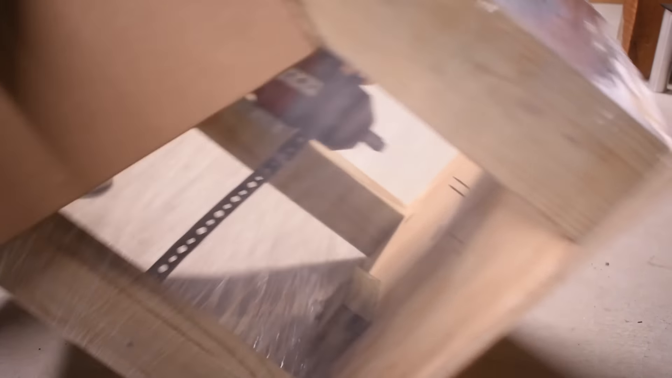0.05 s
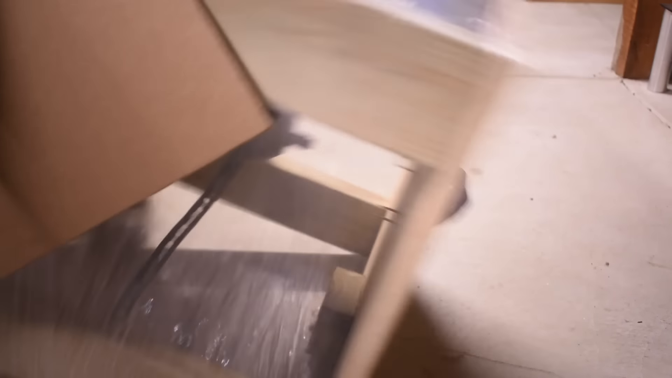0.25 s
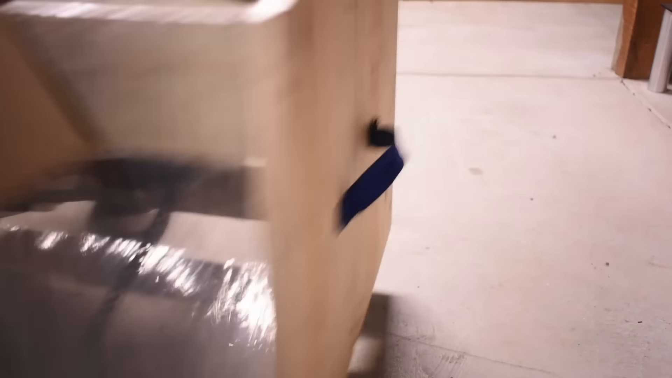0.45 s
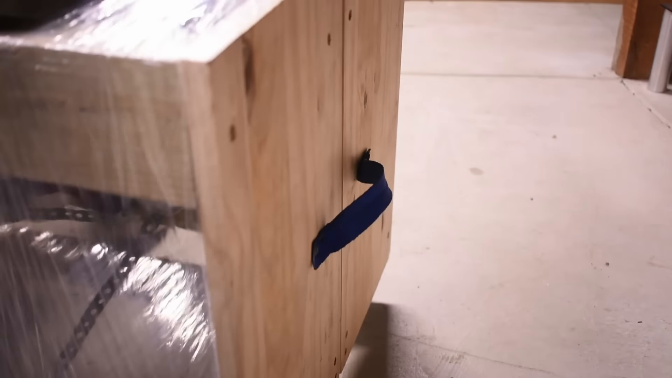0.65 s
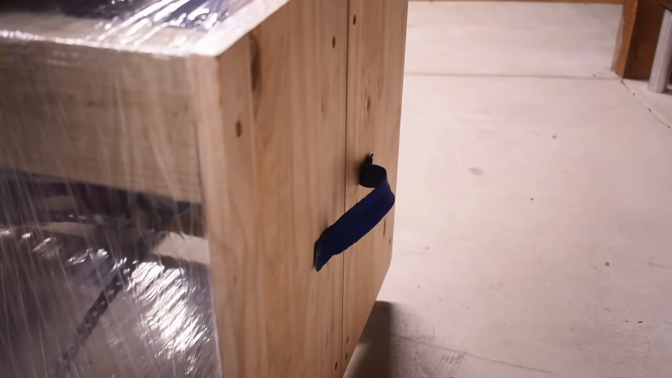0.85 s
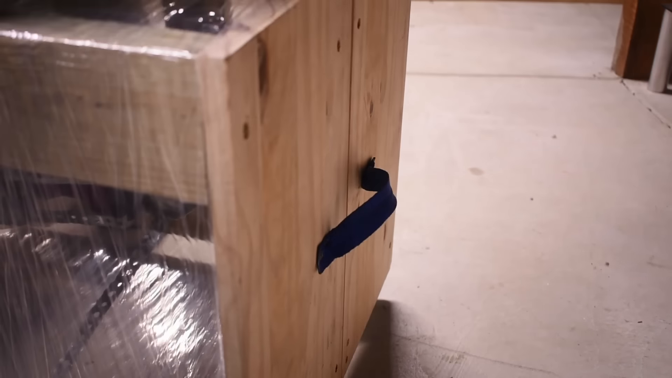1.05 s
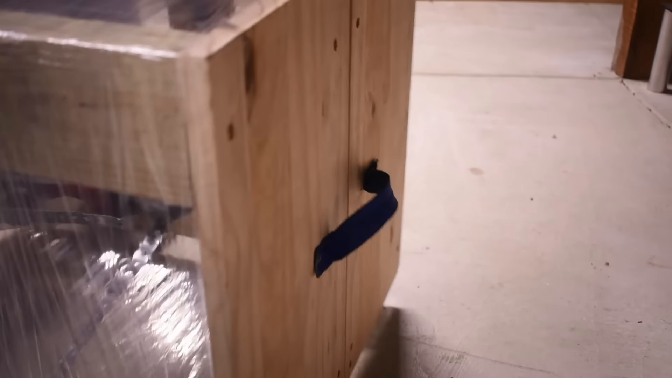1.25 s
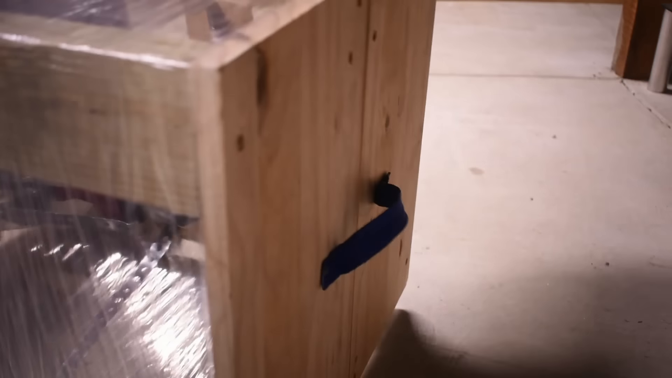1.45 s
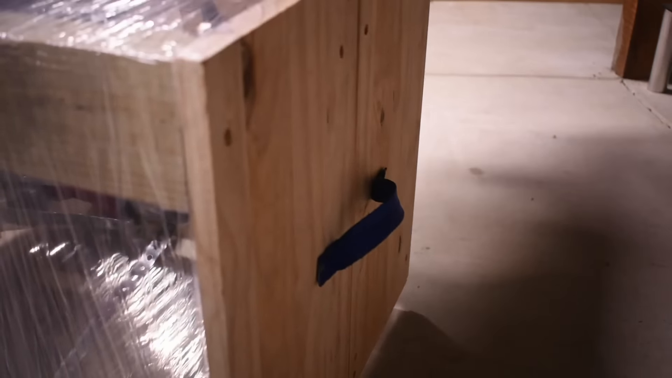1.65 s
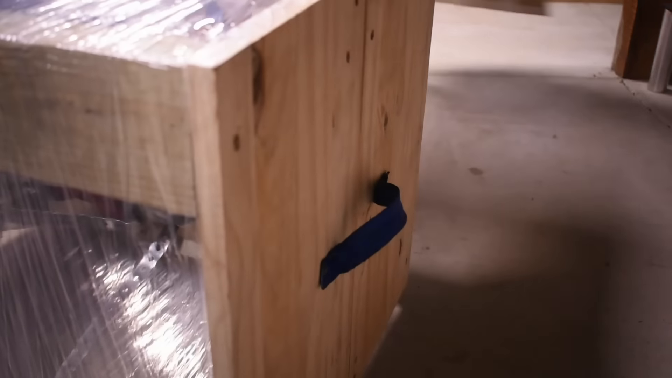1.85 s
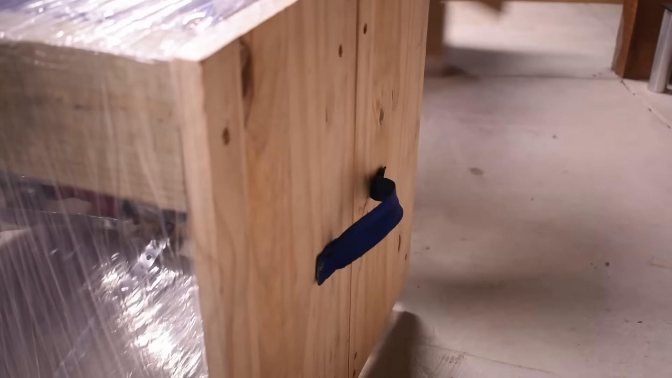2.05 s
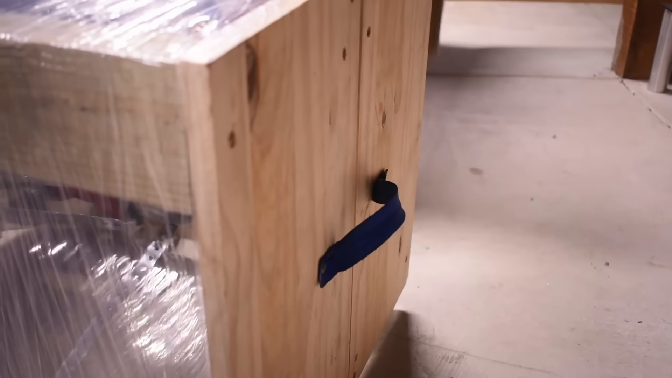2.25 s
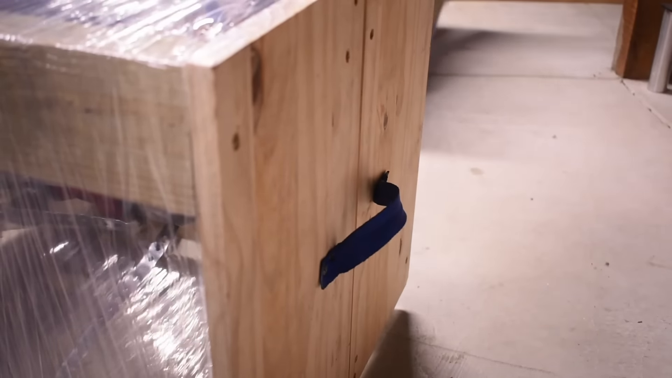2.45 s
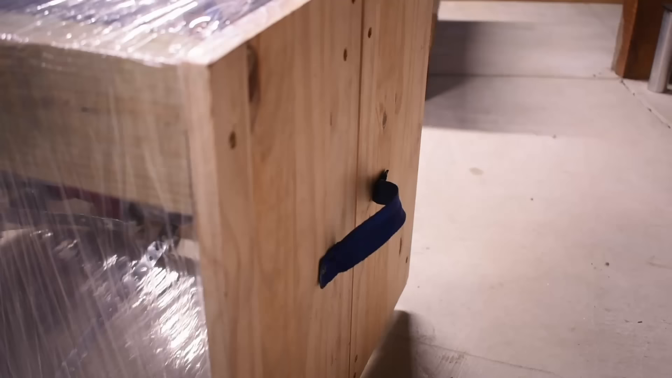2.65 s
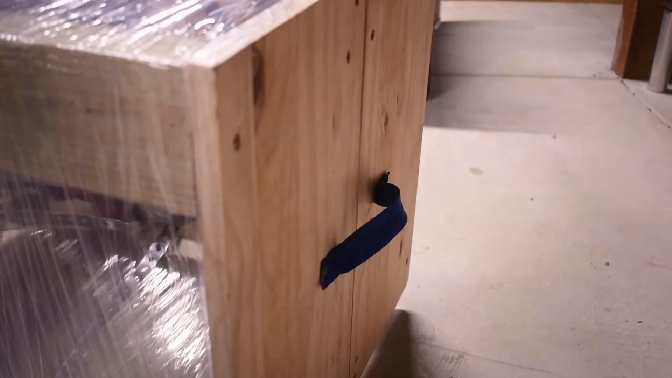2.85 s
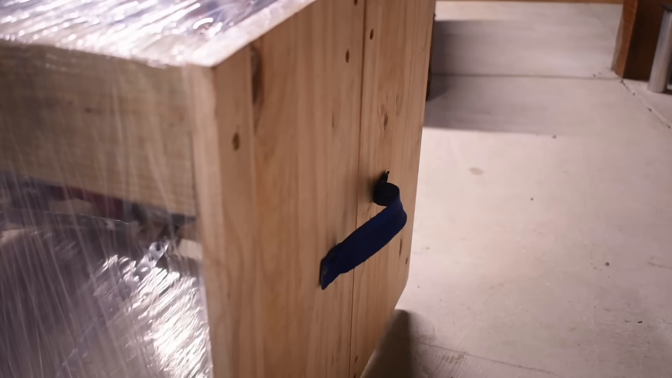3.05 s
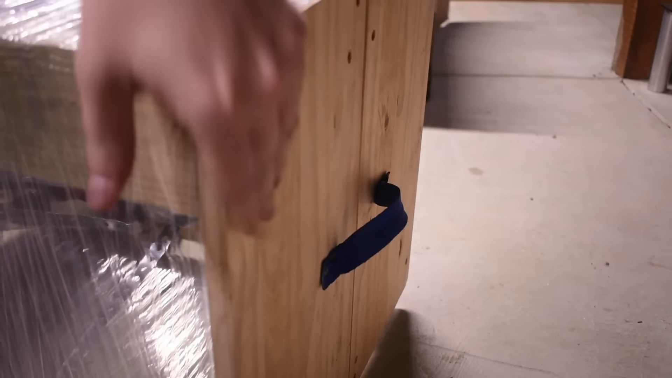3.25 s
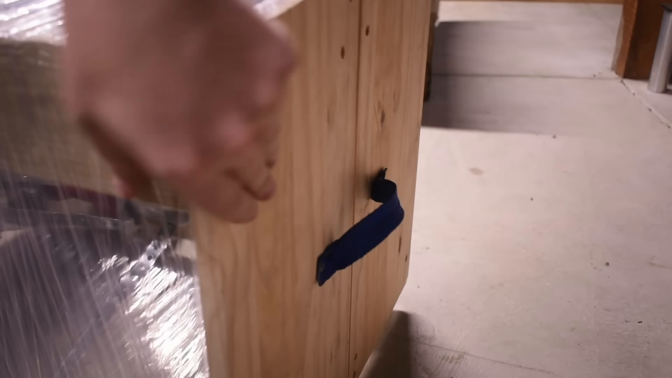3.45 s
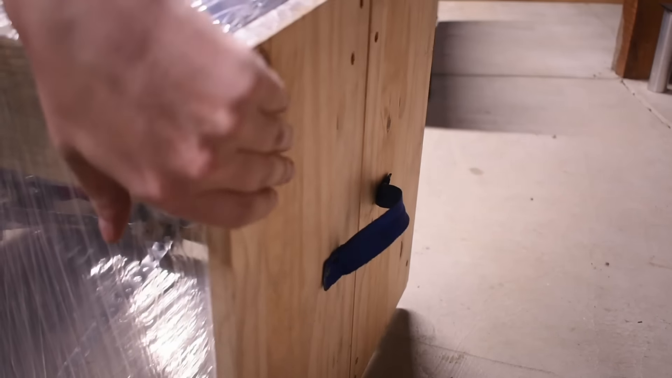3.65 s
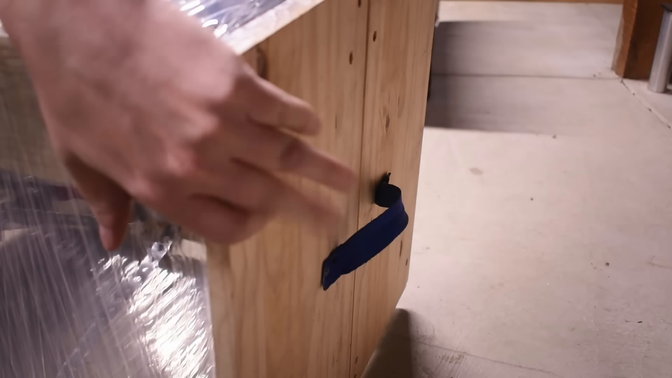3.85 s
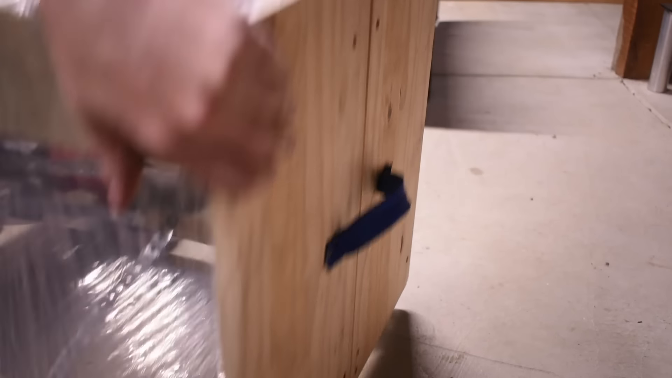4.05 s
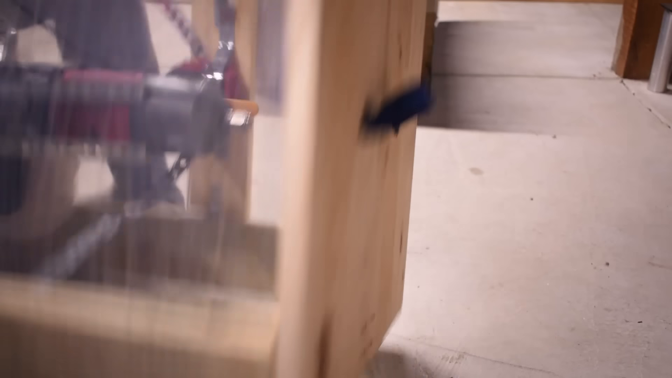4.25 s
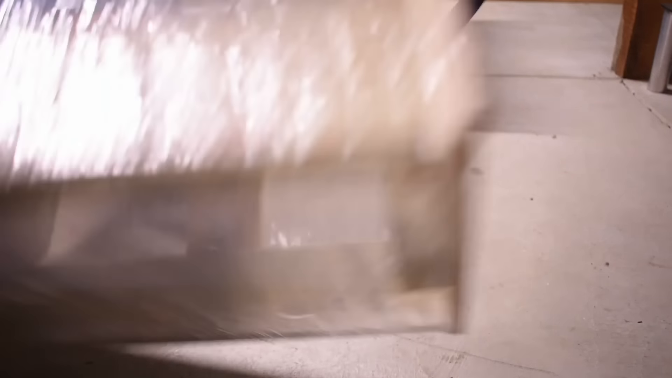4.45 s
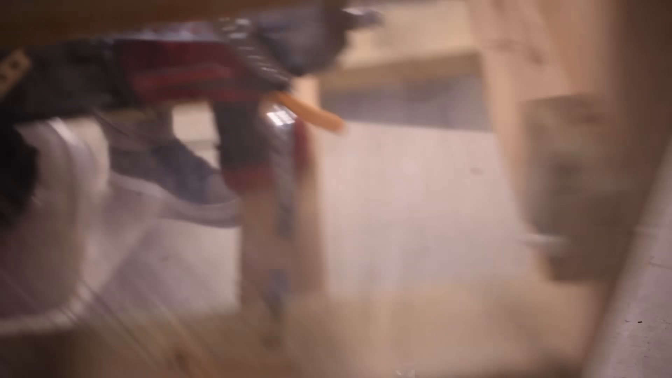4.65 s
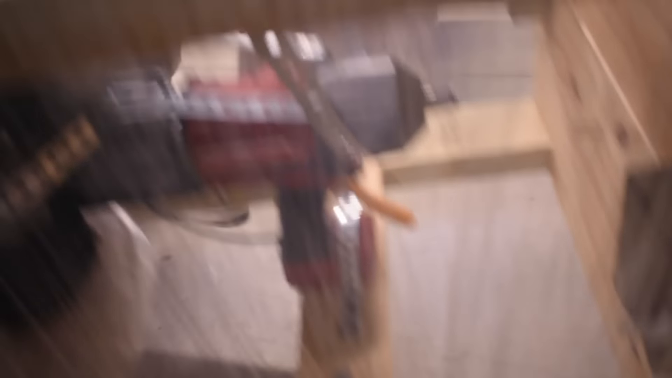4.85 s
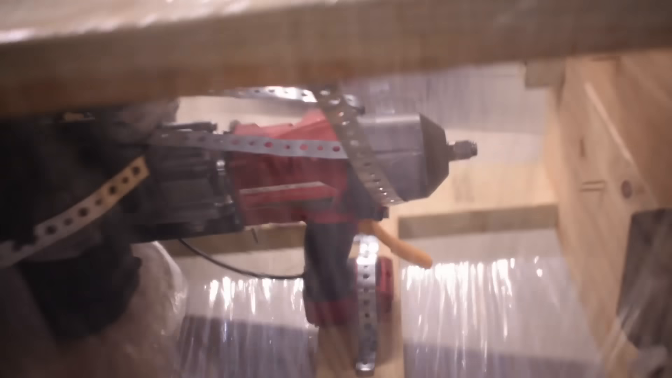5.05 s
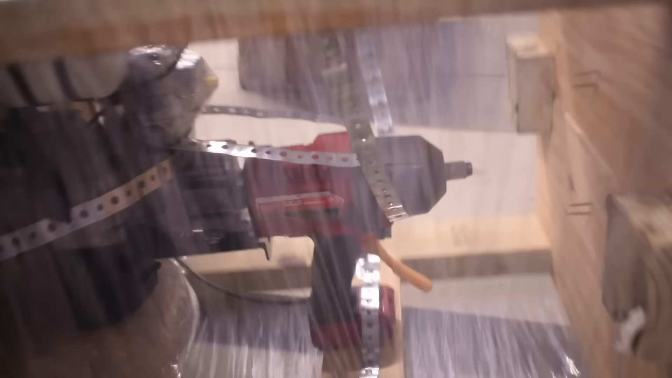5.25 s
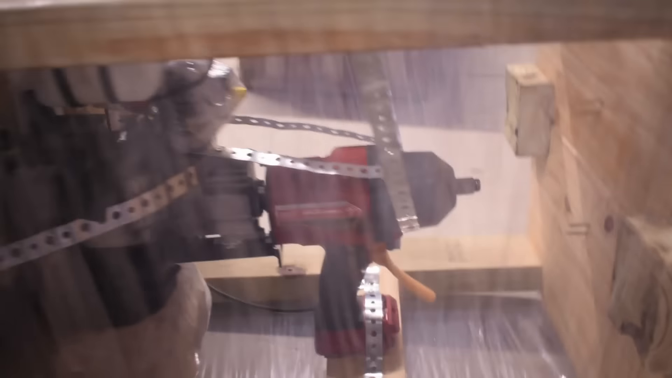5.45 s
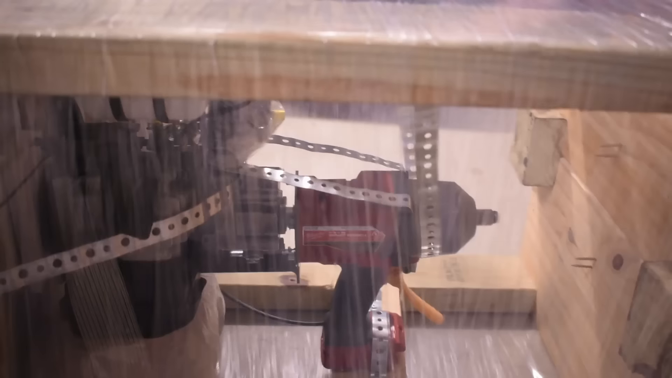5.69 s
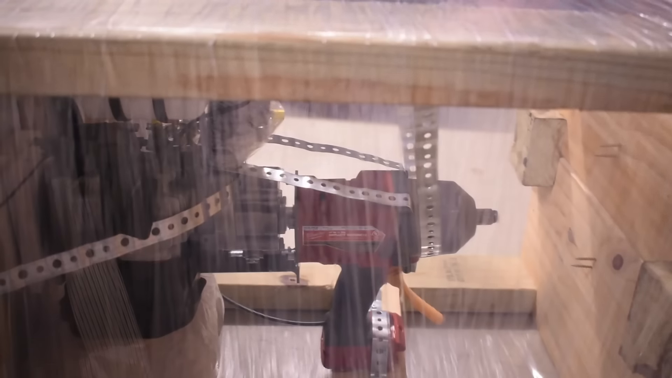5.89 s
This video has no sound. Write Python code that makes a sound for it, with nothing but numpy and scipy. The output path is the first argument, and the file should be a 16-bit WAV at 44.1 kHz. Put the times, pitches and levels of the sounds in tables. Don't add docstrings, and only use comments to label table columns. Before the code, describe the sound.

Heavy wooden thuds and scrapes from a film-wrapped crate, plastic rustling and snapping, faint taps in a lull, then more knocks close up.

```python
import sys
import numpy as np
from scipy import signal
from scipy.fft import rfft, irfft
from scipy.io import wavfile
from scipy.ndimage import uniform_filter1d

SR = 44100
rng = np.random.default_rng(int(sys.argv[2]) if len(sys.argv) > 2 else 0)


def wrap_up_sound(samples):
    columns = np.atleast_2d(samples).T
    tamed = np.clip(columns, -1, 1)
    steps = np.round(tamed * 32767).astype(np.int16)
    wavfile.write(sys.argv[1], SR, steps)


def linear_from_db(decibels):
    return 10 ** (np.asarray(decibels, float) / 20)


N = 261072

# start_s, build_up_s, boom_db,
# fade_s (time to fall 30 dB), shake_db (shaking under the camera, relative to the boom)
FLOOR_LOADS = [(0.049, 0.14, -43, 0.6, -1.5), (.32, .1, -39.5, .4, -6), (.54, 0.03, -37, 0.2, -19),
               (0.899, 0.13, -53.5, 0.26, -21), (1.163, .012, -51.5, .15, -19.5),
               (1.28, 0.046, -58, 1.16, -8), (2.125, .02, -41, 0.35, -6), (2.375, 0.037, -55.5, 0.7, -20),
               (2.47, 0.022, -44.5, .5, -6), (2.6, 0.044, -45, 0.25, -15), (2.83, 0.056, -56.5, 0.2, -4),
               (3.001, .05, -69.5, 1.5, -8), (3.58, 0.074, -66.5, 0.3, -11), (4.16, .1, -65.5, 1.2, -18),
               (4.31, 0.021, -47, 0.25, -28), (4.95, 0.022, -38, 0.13, -14), (5.318, 0.027, -51, .6, -15),
               (5.662, 0.021, -44, 0.12, -10), (5.86, 0.067, -67, .3, -4)]
# start_s, build_up_s, peak_db, fade_s (time to fall 30 dB)
SHOVES = [(.09, .11, -38, 0.78), (.31, 0.068, -30, 0.22), (.428, 0.021, -24, 0.13), (.556, 0.03, -32, 0.1),
          (.905, .045, -46.5, 0), (.987, .01, -45.5, 0.17), (1.164, 0.014, -56, 0.45),
          (1.289, 0.0053, -43.5, 0.18), (1.465, .022, -54, 0.15), (1.612, .006, -49, 0.19),
          (1.88, .03, -66, .2), (2.005, 0.021, -58.5, 0.2), (2.125, 0.0093, -27, 0.16),
          (2.375, 0.0068, -45.5, 0.16), (2.471, 0.021, -29, 0.09), (2.599, .008, -41, 0.29),
          (2.825, 0.028, -56.5, 0.22), (3.04, 0.008, -63.5, .35), (3.285, 0.023, -63, .2),
          (3.6, .02, -60, .25), (3.746, 0.014, -64.5, 0.3), (4.16, 0.073, -51.5, 0.19),
          (4.317, 0.022, -34, 0.12), (4.66, 0.055, -69.5, 0.4), (4.95, .012, -33, 0.14),
          (5.078, 0.034, -70, 1.3), (5.325, .02, -40, 0.16), (5.47, 0.0077, -53.5, 0.28),
          (5.665, 0.013, -39.5, 0.14), (5.86, 0.019, -68.5, 2)]
# start_s, build_up_s, peak_db, fade_s (time to fall 30 dB)
RUBS = [(0, 0.0018, -37, 0.19), (.11, 0.22, -42.5, 0.56), (.565, 0.053, -36, 0.2236),
        (.87, 0.057, -60.5, 0.63), (1.164, 0.011, -46.5, 0.17), (1.355, 0.037, -56, 0.14),
        (1.63, 0.077, -63, 0.16), (1.83, .02, -70, .15), (2.005, .018, -65, 0.04), (2.16, 0.017, -42, 0.12),
        (2.378, 0.029, -48, 0.14), (2.599, .1, -48, 0.1248), (2.824, 0.0037, -62, 0.35),
        (3.05, 0.22, -67, 0.58), (3.556, .002, -71, 0.1), (4.158, 0.078, -61.5, .25),
        (4.455, .003, -53, 0.1), (4.685, .003, -50.5, 0.18), (4.808, 0.13, -61, 1.5),
        (5.079, .002, -54, .08), (5.32, 0.03, -45, 0.24), (5.47, 0.11, -61.5, 0.5),
        (5.88, 0.056, -59.5, .3)]
# start_s, build_up_s, peak_db, fade_s (time to fall 30 dB)
FILM_BENDS = [(0, 0.048, -41.5, 0.16), (.2, 0.13, -49, 0.29), (.38, 0.078, -46, .6),
              (.595, 0.064, -48.5, 0.16), (.87, 0.059, -67, 0.7), (.988, 0.039, -52.5, 0.15),
              (1.164, 0.0033, -59.5, .25), (1.24, .035, -60, 0.3), (1.35, 0.021, -60, 0.24),
              (1.63, 0.056, -64, 0.3), (2.125, 0.05, -44, 0.17), (2.385, 0.014, -59.5, 0.44),
              (2.471, .004, -46.5, .13), (2.599, .004, -58, 0.13), (2.632, .01, -50, 0.1449),
              (2.695, 0.01, -54, 0.15), (2.865, 0.03, -63, 0.12), (3.06, .12, -65, 0.43),
              (3.37, .07, -76, 0.25), (4.158, 0.0027, -58, 0.19), (4.317, 0.0017, -47, 0.21),
              (4.455, .003, -59.5, 0.26), (4.685, .003, -57.5, 0.3), (4.808, 0.078, -60.5, 0.4),
              (4.95, 0.0033, -39, 0.1371), (5.15, 0.02, -61, .3), (5.32, 0.044, -45.5, 0.14),
              (5.47, 0.038, -59, 0.36), (5.665, 0.016, -48.5, .12), (5.86, 0.011, -66.5, 2)]
# start_s, panel_hz, second_panel_hz,
# second_db (relative to the first)
STANCES = [(0, 222, 480, -14.5), (0.427, 235.4, 480, -4), (.556, 223.9, 548, -4.5),
           (1.164, 228.2, 595, -12.5), (2.005, 300, 545, -4), (2.471, 310.6, 499.4, 0.5),
           (2.599, 210.1, 342.3, -3), (3.05, 290, 540, -7.5), (3.554, 211.6, 376.5, -8.5),
           (4.157, 238.6, 540, -8), (4.457, 188.5, 384.5, -3.5), (4.95, 233, 480, -9),
           (5.318, 294, 517, -4), (5.47, 216.2, 333.2, 0), (5.661, 243.4, 500, -6)]
# pitch_hz, width_hz, level_db
LOW_PANELS = [(180, 53, 1), (232, 33, -5), (343, 120, -3.5), (480, 110, -2.5), (545, 57, -3.5)]
# pitch_hz, width_hz, level_db
HIGH_PANELS = [(806, 160, -7.5), (1042, 65, 13), (1262, 92, 8.5), (1680, 114, 1), (2030, 470, -23.5),
               (2419, 140, 3), (3020, 250, -15.5)]
# pitch_hz, level_db
SCRAPE_COLOUR = [(290, -19), (500, -8.5), (629, 0), (770, -5), (1060, -16), (1300, -16), (1650, -4),
                 (4500, -24), (5850, -57), (9900, -120)]
# pitch_hz, level_db
RUSTLE_COLOUR = [(1880, -16), (3200, -6), (4720, -9), (9260, -17), (14900, -22.5), (15800, -23),
                 (16300, -34.5)]
# start_s, treble_db
FILM_SHEEN = [(0, 4), (.7, -4), (1.3, 4.5), (2.2, 2.5), (2.9, -2), (3.3, 1), (4.3, -2.5), (5.2, -7),
              (5.92, -6)]
# start_s, length_s, pitch_hz, width_hz, level_db
STRAP_JINGLES = [
    (0.468, .025, 12760, 150, -57),
    (0.478, 0.049, 9430, 587.8, -55.5),
    (0.571, .1, 9300, 900, -54.5),
    (0.591, 0.04, 2780, 500, -37),
    (3.133, 0.079, 4100, 149, -74),
    (3.18, 0.052, 526, 60, -63.5),
    (5.08, 0.012, 2200, 1600, -51),
    (5.096, 0.0089, 2340, 1230, -47.5),
    (5.879, 0.058, 1600, 120, -57.5),
]
# length_s, pitch_hz, width_hz, level_db
BOARD_HUM = (.11, 131.5, 22, -38.5)
BOARD_HUM_START_S = 2.615
# start_s, pitch_hz, peak_db, ring_s (time to fall 60 dB)
TAPS = [(1.168, 1200, -42, .02), (1.4815, 1670, -52, .015), (4.6199, 6000, -62, .004),
        (4.6289, 7000, -60, .004), (1.8232, 1310, -61, .02), (1.9723, 2820, -60, .01),
        (2.3869, 1630, -44, .02), (2.3999, 900, -43, .02), (3.04, 400, -58, .04), (3.0579, 1600, -62, .02),
        (3.245, 520, -62, .06), (3.25, 1500, -64, .08), (3.285, 290, -56, .12), (3.29, 2300, -69, .05),
        (3.5567, 900, -57, .02), (3.6, 400, -58, .08), (3.6565, 614, -60, .03), (3.7468, 1210, -58, .02),
        (3.8271, 1580, -62, .03), (3.9349, 1600, -63, .015), (4.0731, 1300, -64, .02),
        (4.1923, 1750, -46, .015), (4.2557, 2980, -56, .02), (4.285, 1200, -54, .03),
        (4.658, 600, -60, .02), (4.6857, 1160, -46, .03), (4.8104, 1610, -53, .02), (4.907, 3000, -56, .01),
        (5.072, 4500, -54, .02), (5.0808, 1660, -42, .015), (5.0978, 1870, -43, .015),
        (5.1572, 2820, -54, .02), (5.1641, 2750, -52, .02), (5.245, 2200, -56, .02)]
# start_s, pitch_hz, peak_db, ring_s (time to fall 60 dB)
BOARD_RINGS = [(.428, 1700, -26, .04), (.433, 720, -15, .05), (.438, 1043, -21, .06), (.44, 2900, -32, .04),
               (.436, 236, -17, .05), (.4445, 236, -16, .06), (.452, 420, -20, .05), (.459, 640, -22, .05),
               (.563, 700, -22, .04), (.5652, 215, -13.5, .09), (.582, 215, -14, .06),
               (.592, 190, -22, .08), (.606, 1110, -28, .06), (.614, 620, -29, .04),
               (2.1325, 540, -15, .05), (2.132, 1570, -27, .04), (2.128, 1040, -25, .05),
               (2.137, 1200, -26, .04), (2.137, 330, -15, .035), (2.128, 200, -22, .08),
               (2.16, 520, -19, .04), (2.163, 1950, -32, .03), (2.174, 1900, -35, .03),
               (2.205, 330, -32, .08), (2.473, 640, -19, .05), (2.475, 1100, -26, .06),
               (2.481, 300, -17, .04), (2.49, 1400, -30, .05), (2.49, 484, -18, .07),
               (2.495, 200, -24, .04), (4.317, 2500, -30, .035), (4.318, 1670, -32, .04),
               (4.32, 830, -30, .04), (4.326, 1210, -33, .06), (4.328, 1670, -34, .04),
               (4.3307, 242, -22, .1), (4.339, 242, -24, .05), (4.358, 380, -34, .04),
               (4.37, 250, -33, .08), (4.402, 250, -40, .1), (4.951, 1670, -30, .05),
               (4.955, 242, -26, .08), (4.961, 3230, -29, .03), (4.962, 5500, -36, .02),
               (4.962, 4300, -34, .03), (4.963, 7000, -40, .02), (4.975, 3000, -40, .04),
               (5.345, 700, -38, .05), (5.372, 1500, -42, .04), (5.375, 600, -40, .05)]
# start_s, snap_db, tick_db (bright tick relative to the snap)
SLACK_SNAPS = [(0.4436, -38, -29), (0.4709, -30, -21), (0.6135, -24, -16.5), (0.6654, -31.5, -6.5),
               (0.9288, -53, -17), (1.0234, -38, -7), (1.1674, -42, -11), (1.3543, -56, -14.5),
               (1.643, -49.5, -10.5), (2.1627, -36, -14), (2.4748, -27, -29), (2.6, -42.5, -8),
               (2.6317, -46, -7), (2.7, -42, -17.5), (2.869, -56, 1), (2.903, -58, 3), (4.318, -32, -32),
               (4.6831, -53.5, -7.5)]
SLACK_HZ = 1117
# start_s, snap_db, pitch_hz, tick_db (bright tick relative to the snap)
TIGHT_SNAPS = [(0.316, -28, 1970, -15), (0.3493, -39, 1348, -15.5), (0.9886, -29.5, 1640, -17),
               (1.2375, -44, 1440, -2.5), (1.4815, -49.5, 1670, -7), (3.3708, -60, 1962, -12),
               (3.6763, -55, 1358, -26), (4.1591, -38, 1780, -26), (4.1913, -43.5, 1740, -19),
               (4.4552, -29.5, 3020, -17), (4.6269, -67, 1650, 3), (4.665, -67, 1703, 3),
               (4.9531, -27, 1680, -15), (4.9601, -21, 3040, -19.5), (5.3319, -29, 3480, -18),
               (5.4124, -39, 1690, -25), (5.471, -40, 2010, -8), (5.5163, -42.5, 1680, -18),
               (5.559, -45, 1970, -8.5), (5.675, -39, 1460, -8.5), (5.7197, -35, 1650, -9.5),
               (5.8614, -48.5, 1642, -16)]
# start_s, blow_db, second_panel_hz, second_db (relative to the blow),
# hard_db (high tones relative to the blow)
KNOCKS = [(0.428, -14.5, 844, -3, -8), (0.4487, -16.5, 640, -8, -14), (0.559, -25, 426, -6, -10),
          (0.582, -21, 180, -3, -18), (0.988, -35, 482, -10, -8.5), (1.167, -46.5, 900, 0, 1),
          (1.292, -39, 175, -1, -10), (1.465, -44, 427, -17, -27), (1.614, -44.5, 537, -10, -21),
          (2.126, -13.5, 559, -1, -15), (2.159, -22, 544, -7, -25), (2.376, -39, 617, -3, -8),
          (2.472, -14, 500, -4, -11.5), (2.6, -31, 570.2, -6, -16), (3.606, -55.5, 402, -6, -26),
          (3.679, -52.5, 154.7, -2, -13), (3.746, -56, 439, -5, -10), (3.829, -59, 664, -9.5, -6),
          (3.984, -56, 474, -5, -4.5), (4.316, -30, 145, 0, 0), (4.326, -24, 547, -14, -30),
          (4.954, -26, 748, -8, -10), (5.34, -38.5, 510, -12, -15.5), (5.661, -31.5, 657, -9, -11)]
# pitch_hz, decay_s (time to fall 60 dB)
ROOM_DECAY = [(100, .3), (300, .2), (2000, .16), (6000, .12), (14000, .08)]
# pitch_hz, difference_db (relative to their sum)
PORT_DIFFERENCE = [(150, -40), (700, -22), (1400, -21), (2800, -15.5), (5600, -9.5), (10000, -3),
                   (14000, -2)]


def evened(x):
    return x / np.sqrt(np.mean(x ** 2) + 1e-20)


def read(points, hz):
    f, value = np.transpose(points)
    return np.interp(np.log(hz + 1), np.log(f + 1), value)


def add(mix, s, sound):
    part = mix[round(s * SR):][:len(sound)]
    part += sound[:len(part)]


def resonate(x, hz, width):
    turn = np.exp(2j * np.pi * np.cumsum(hz * np.ones(len(x))) / SR)
    r = np.exp(-np.pi * width / SR)
    smoothed = signal.lfilter([1 - r], [1, -r], x / turn + 1e-18)
    return 2 * (turn * smoothed).real


def highpass(hz):
    return signal.butter(2, hz, "high", fs=SR, output="sos")


def coloured(x, spectrum):
    gain = linear_from_db(read(spectrum, np.fft.rfftfreq(len(x), 1 / SR)))
    return evened(irfft(rfft(x) * gain, len(x)))


def grains(per_s, spread_db, smooth):
    size = linear_from_db(spread_db * np.minimum(rng.exponential(1, N), 4)) * rng.standard_normal(N)
    slips = evened(size * (rng.random(N) < per_s / SR))
    return slips + smooth * rng.standard_normal(N)


def clumps(width_s, depth_db):
    wander = uniform_filter1d(rng.standard_normal(N), int(width_s * SR))
    return linear_from_db(depth_db * evened(wander))


def bursts(rows, start_db, rest_db):
    t = np.arange(N // 32 + 2) * 32 / SR
    power = linear_from_db(2 * rest_db)
    for s, build, db, fade in rows:
        u = t - s
        rising_db = start_db * (1 - u / build)
        falling_db = -30 * (u - build) / fade
        shape_db = np.clip(np.where(u < build, rising_db, falling_db), -200, 0)
        power = power + (u >= 0) * linear_from_db(2 * (db + shape_db))
    return np.interp(np.arange(N) / SR, t, np.sqrt(power))


def stance(t):
    s, *columns = np.transpose(STANCES)
    index = np.maximum(np.searchsorted(s, t + .004, "right") - 1, 0)
    return [c[index] for c in columns]


def rumble():
    s, build, boom_db, fade, shake_db = np.transpose(FLOOR_LOADS)
    boom = coloured(rng.standard_normal(N),
                    [(50, -38.5), (75, -5), (95, -2.5), (125, -1), (150, -8.0), (200, -45.5)])
    shake = coloured(rng.standard_normal(N), [(12, -38.5), (25, 4.5), (33, -3), (48, -1), (70, -42)])
    boom_level = bursts(zip(s, build, boom_db, fade), start_db=-11, rest_db=-80)
    shake_level = bursts(zip(s, build, boom_db + shake_db, 1.1 * fade), start_db=-14.5, rest_db=-76.5)
    return boom * boom_level + shake * shake_level


def panel_shake():
    first_hz, second_hz, second_db = stance(np.arange(N) / SR)
    slips = grains(300, spread_db=0.5, smooth=.6)
    fixed = 0
    for k, (hz, width, db) in enumerate(LOW_PANELS):
        fixed = fixed + (-1) ** k * linear_from_db(db) * evened(resonate(slips, hz, width))
    first = evened(resonate(resonate(slips, first_hz, 70), first_hz, 89))
    second = evened(resonate(resonate(slips, second_hz, 70), second_hz, 89))
    drag = signal.sosfilt(highpass(130), first - linear_from_db(second_db) * second + .5 * fixed)
    return evened(drag) * bursts(SHOVES, start_db=-12, rest_db=-83)


def scrape(cluster):
    grit = cluster * grains(900, spread_db=2.5, smooth=0.94)
    boards = 0
    for k, (hz, width, db) in enumerate(HIGH_PANELS):
        boards = boards + (-1) ** k * linear_from_db(db) * resonate(grit, hz, width)
    # start, build-up, level 4 dB under the blow's high tones, fade
    jars = [(s, 0.0025, db + hard_db - 4, 0.11) for s, db, _, _, hard_db in KNOCKS]
    return coloured(grit + 1.64 * boards, SCRAPE_COLOUR) * bursts(RUBS + jars, start_db=-6.5, rest_db=-79)


def rustle(cluster):
    crackle = cluster * clumps(0.0047, depth_db=1.5) * grains(1500, spread_db=3.5, smooth=2.2)
    film = coloured(crackle, RUSTLE_COLOUR)
    treble = signal.sosfiltfilt(highpass(8500), film)
    sheen_db = np.interp(np.arange(N) / SR, *np.transpose(FILM_SHEEN))
    film = film + (linear_from_db(sheen_db) - 1) * treble
    return film * bursts(FILM_BENDS, start_db=-8, rest_db=-85.5)


def handling():
    cluster = clumps(0.0094, depth_db=1.36)
    return panel_shake() + scrape(cluster) + rustle(cluster)


def jingle(s, length, hz, width_hz, db):
    n = round(length * SR)
    shiver = resonate(resonate(rng.standard_normal(n), hz, width_hz), hz, width_hz)
    return s, linear_from_db(db) * evened(shiver) * signal.windows.tukey(n, .6)


def ring(s, hz, db, t60, rise_s, partner_db):
    t = np.arange(SR // 5) / SR
    partner = linear_from_db(partner_db - 60 * t / t60) * np.sin(2 * np.pi * 1.47 * hz * t)
    pair = np.sin(2 * np.pi * hz * t) + partner
    return s, linear_from_db(db - 60 * t / t60) * np.minimum(t / rise_s, 1) * pair


def snap(s, db, hz, tick_db):
    t = np.arange(2000) / SR
    body, tick = rng.standard_normal((2, len(t)))
    body = resonate(resonate(body * np.exp(-t / .004), hz, .9 * hz), hz, .9 * hz)
    tick = signal.sosfilt(highpass(5000), tick * np.exp(-t / 0.003))
    return s, linear_from_db(db) * (body / abs(body).max() + linear_from_db(tick_db + 6.5) * tick / abs(tick).max())


def knock(s, db, second_hz, second_db, hard_db, chance):
    blows = np.zeros(SR // 6)
    corners = (np.cumsum(chance[:4]) * .006 * SR).astype(int)
    blows[corners] = 0.4 ** np.arange(1, 5) * np.sign(chance[4:8] - .4)
    blows[0] = 1

    soft = np.convolve(blows, np.hanning(30), "full")[:len(blows)]
    first = evened(resonate(soft, 1.04 * stance(s)[0], 60))
    second = evened(resonate(soft, second_hz, 50))
    others = sum(linear_from_db(d) * evened(resonate(soft, f, w)) for f, w, d in LOW_PANELS)
    low = first - linear_from_db(second_db + 5.5) * second + .25 * others

    sharp = np.convolve(blows, np.hanning(12), "full")[:len(blows)]
    high = 0
    for k, (f, w, d) in enumerate(HIGH_PANELS):
        pitch_hz = f * (0.89 + .06 * chance[8 + k])
        high = high + (-1) ** k * linear_from_db(d) * resonate(sharp, pitch_hz, 0.64 * w)
    return s, linear_from_db(db) * (low / abs(low).max() + linear_from_db(hard_db) * high / abs(high).max())


def room(x):
    taps = np.zeros(SR // 2)
    at = np.arange(200, len(taps) - 20, 20)
    taps[at + rng.integers(0, 20, len(at))] = rng.choice([-1., 1.], len(at))
    hz, t, z = signal.stft(taps, SR, nperseg=512)
    decay = linear_from_db(-60 * t / read(ROOM_DECAY, hz)[:, None])
    tail = signal.istft(z * decay, SR, nperseg=512)[1]
    return signal.fftconvolve(x, tail / np.linalg.norm(tail))[:N]


def ports(x):
    hz, t, z = signal.stft(x, SR, nperseg=256)
    random_phase = np.exp(2j * np.pi * rng.random(z.shape[::-1]).T)
    scrambled = z * linear_from_db(read(PORT_DIFFERENCE, hz))[:, None] * random_phase
    side = signal.istft(scrambled, SR, nperseg=256)[1][:N] + 0.0091 * x
    return np.array([x + side, x - side])


def scene():
    hits, ticks, boards = np.zeros((3, N))
    for row in STRAP_JINGLES + [(BOARD_HUM_START_S, *BOARD_HUM)]:
        add(ticks, *jingle(*row))
    for row in TAPS:
        add(ticks, *ring(*row, rise_s=.0004, partner_db=-6))
    for row in BOARD_RINGS:
        add(boards, *ring(*row, rise_s=.003, partner_db=-15))
    for s, db, tick_db in SLACK_SNAPS:
        add(ticks, *snap(s, db, SLACK_HZ, tick_db))
    for row in TIGHT_SNAPS:
        add(ticks, *snap(*row))
    for row, chance in zip(KNOCKS, rng.random((len(KNOCKS), 16))):
        add(hits, *knock(*row, chance))
    echoes = room(linear_from_db(-10) * hits + linear_from_db(-13) * boards + linear_from_db(-8) * ticks)
    direct = linear_from_db(-1.0) * hits + boards + linear_from_db(-2.5) * ticks
    return ports(direct + echoes + handling() + rumble())


def band_limit(x):
    return signal.sosfilt(signal.butter(12, 16650, fs=SR, output="sos"), x)


def record(dry):
    lowpass = signal.firwin(601, 15850, fs=SR)
    limited = signal.oaconvolve(dry, lowpass[None], "same")
    return band_limit(limited)


dry = scene()
out = record(dry)
wrap_up_sound(out)
```